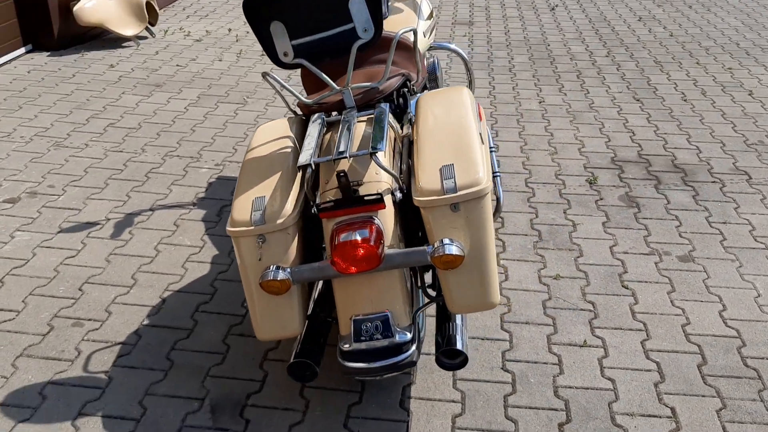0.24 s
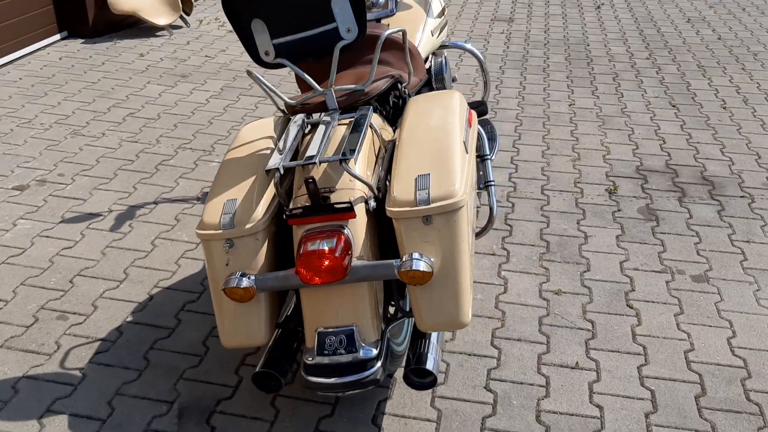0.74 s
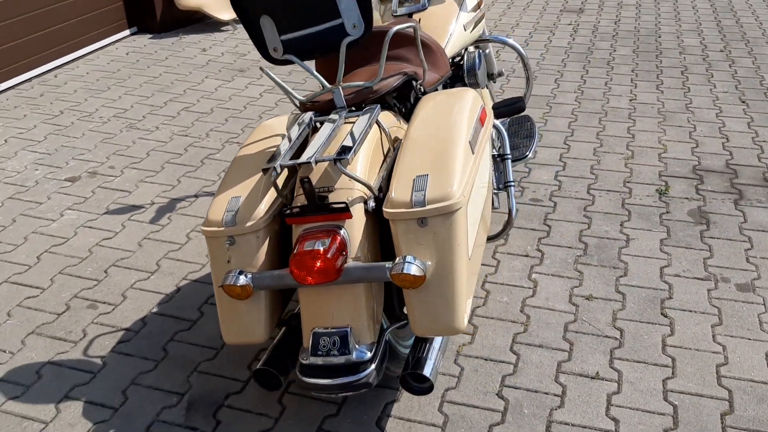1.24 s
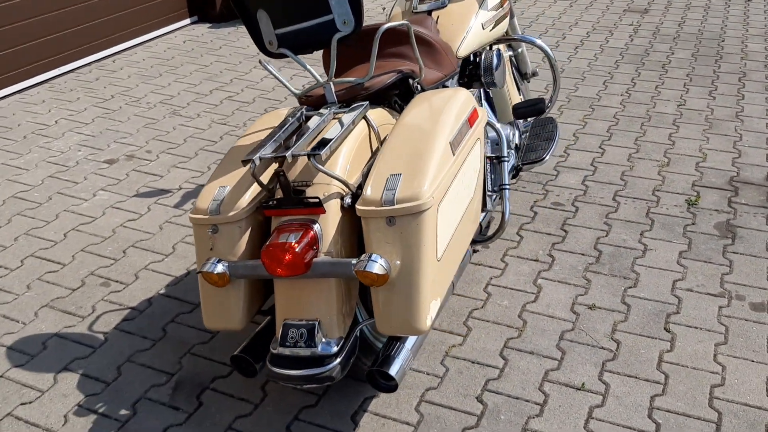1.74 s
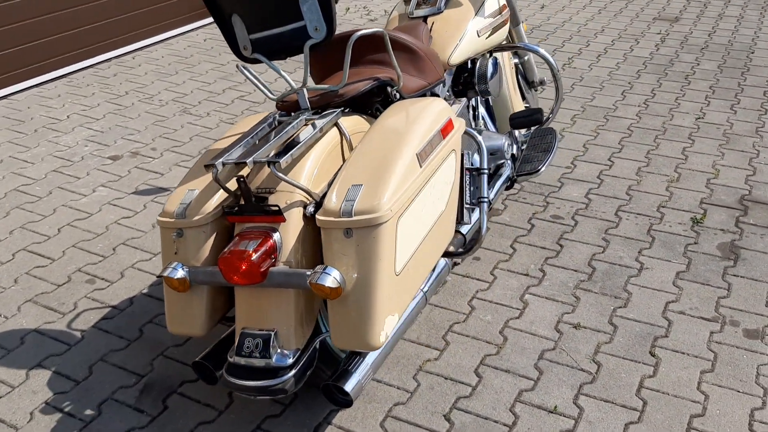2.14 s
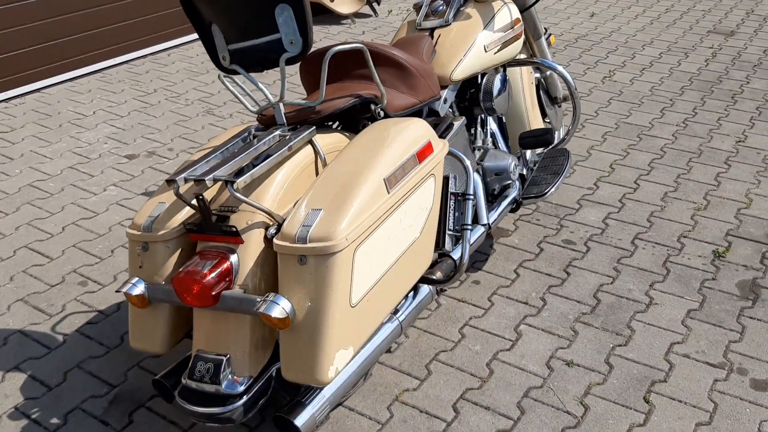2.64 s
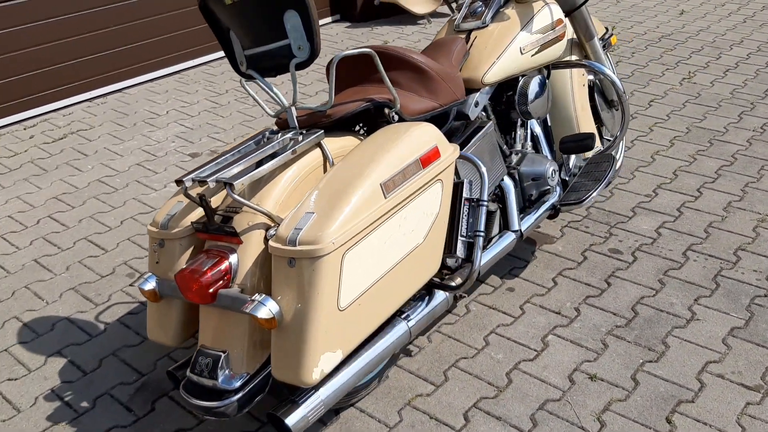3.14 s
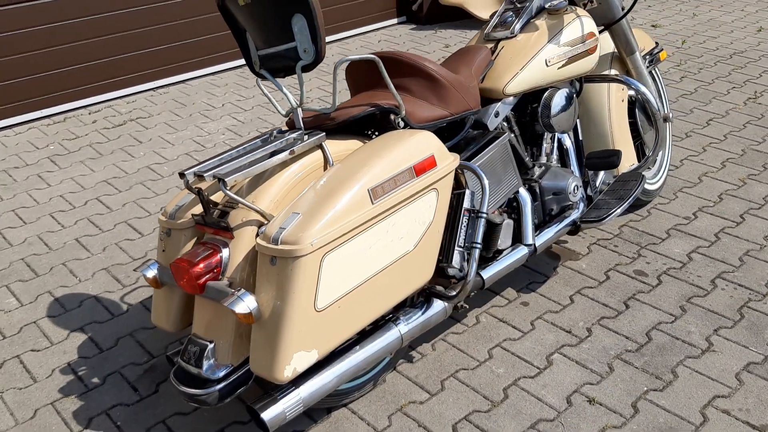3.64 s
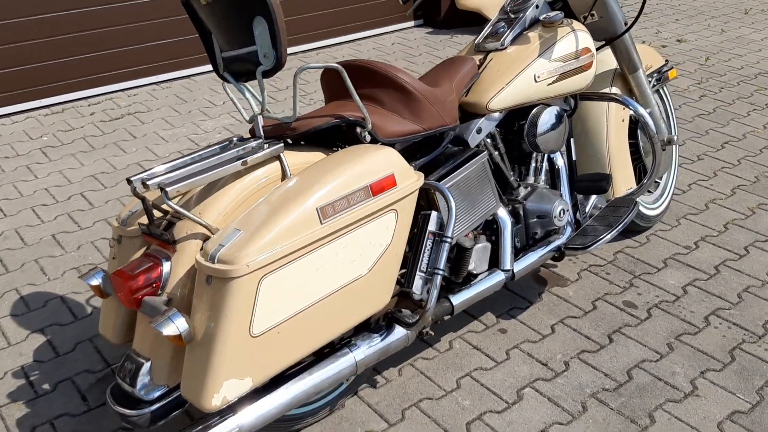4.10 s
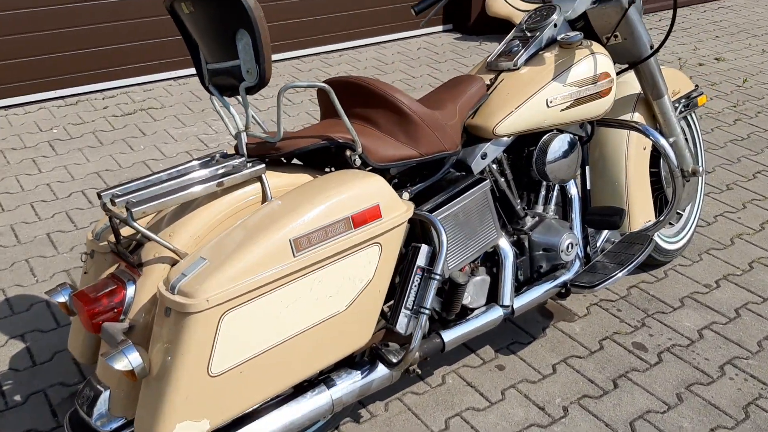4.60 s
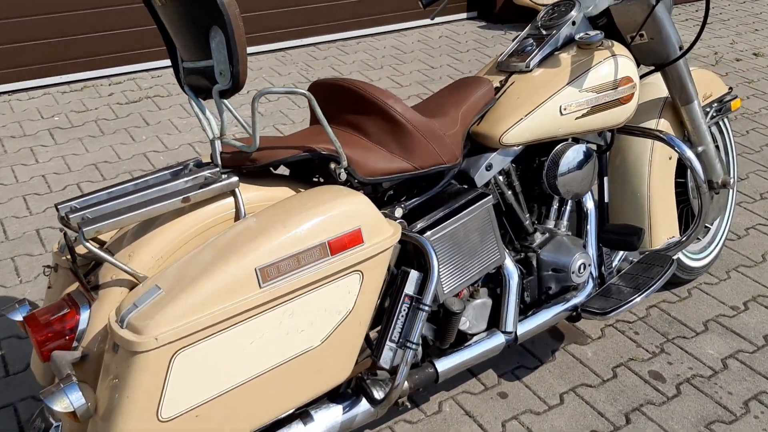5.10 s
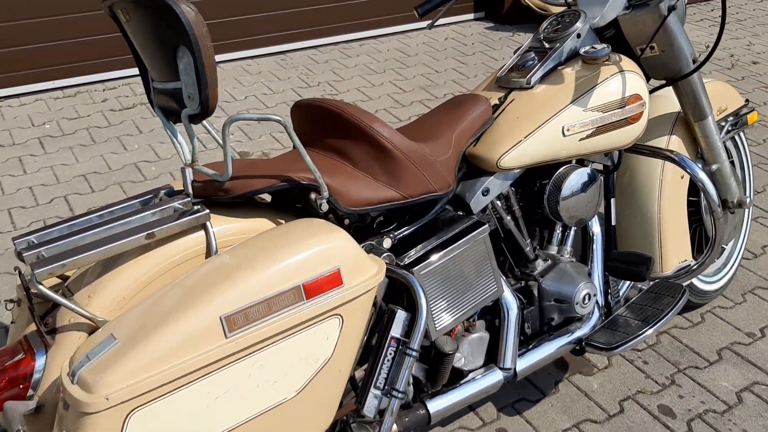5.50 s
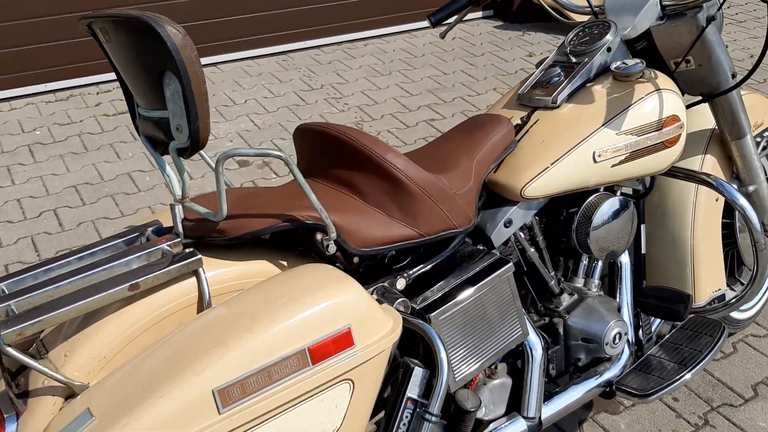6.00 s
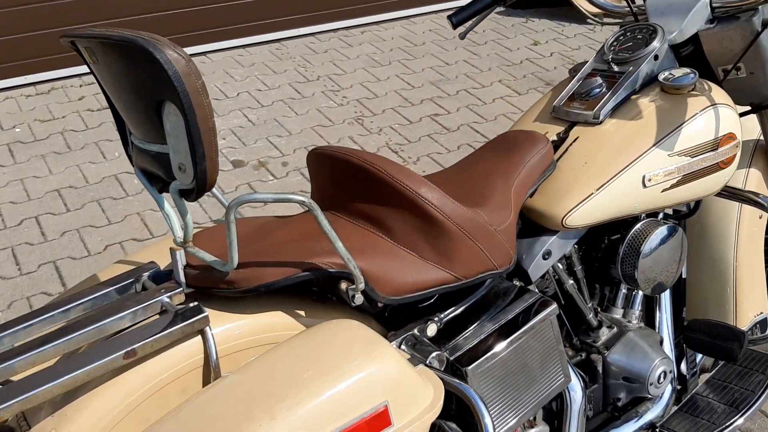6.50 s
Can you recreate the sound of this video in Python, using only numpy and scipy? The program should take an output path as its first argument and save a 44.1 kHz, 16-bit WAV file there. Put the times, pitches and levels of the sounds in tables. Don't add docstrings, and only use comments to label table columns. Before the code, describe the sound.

A heavy twin-cylinder motorcycle engine runs at a slow, loping idle throughout, close and dry in open air, in stereo. Strong low exhaust beats alternate irregularly with weak or missed ones. Gas puffs hiss and chirp, pipe shields and luggage rack buzz with the blows. The listener walks from the exhaust outlets to the engine side, where metallic clatter and intake breaths come forward while whistles fade.

```python
import sys
import numpy as np
from scipy import signal
from scipy.fft import rfft, irfft, next_fast_len
from scipy.io import wavfile
from scipy.ndimage import uniform_filter1d, map_coordinates

SR = 44100
rng = np.random.default_rng(int(sys.argv[2]) if len(sys.argv) > 2 else 0)


def invert_db(x):
    u = np.asarray(x, float) / 20
    return 10 ** u


def to_wav(s):
    ch = np.atleast_2d(s).T
    pcm = np.round(np.clip(ch, -1, 1) * 32767)
    wavfile.write(sys.argv[1], SR, pcm.astype(np.int16))


N = 297675

# (time [s], blow [1 = usual], jet hiss [dB])
FRONT_FIRINGS = [(0.3628, 1.52, -31.5), (0.6893, 1.38, -32), (0.8428, 1, -39), (0.9919, 1.32, -35.5),
                 (1.301, 1.1, -39), (1.6326, 1.24, -32), (1.784, 0.95, -38.5), (1.9351, 1.03, -36),
                 (2.086, 0.92, -37.5), (2.2462, 1.02, -35.5), (2.401, 0.98, -38), (2.553, 0.94, -39.5),
                 (2.7103, 1.07, -35), (2.8531, 0.99, -36.5), (2.9994, 1, -34), (3.3108, 0.92, -33.5),
                 (3.6013, 1.02, -34), (3.912, 0.95, -37), (4.068, 0.89, -36), (4.2243, 1.08, -35.5),
                 (4.5745, 1, -29), (4.912, 1.17, -30), (5.1008, 0.93, -30.5), (5.431, 0.95, -34.5),
                 (5.6058, 1.01, -35.5), (5.7761, 0.95, -33.5), (5.9476, 1.03, -34), (6.2891, 1.15, -34.5),
                 (6.6275, 1.31, -33.5)]
# (time [s], blow [1 = usual], jet hiss [dB])
FRONT_STUMBLES = [(-0.024, 1, -32), (0.18, -0.29, -47.5), (0.5261, -0.55, -47), (1.139, -0.42, -47),
                  (1.4721, -0.41, -47), (3.1484, 0.79, -39.5), (3.4535, 0.78, -40), (3.7522, 0.65, -42),
                  (4.3866, -0.5, -38.5), (4.743, -0.52, -40.5), (5.265, 0.71, -36), (6.1128, 0.42, -38),
                  (6.4616, 0.62, -39.5)]
# (time [s], blow [1 = usual], jet hiss [dB])
REAR_FIRINGS = [(0.065, -0.35, -53), (0.2704, 1.15, -37.5), (0.5986, 1.25, -35.5), (0.9103, 1.1, -36.5),
                (1.5456, 1.22, -36), (1.8513, 1.09, -36.5), (2.3153, 1.06, -34), (2.7767, 1.05, -39),
                (3.219, 0.34, -46), (3.3759, 1, -38.5), (3.8232, 0.84, -36), (3.9792, 0.5, -43.5),
                (4.1349, 0.81, -40), (4.6536, 1.1, -33), (5.18, 1.18, -33.5), (5.5072, 0.93, -35),
                (5.6817, 0.95, -36.5), (6.02, 1.07, -33.5), (6.541, 1.1, -35), (6.693, -0.53, -42)]
VALVE_SHUTS = [
    (.64, 0.092),
    (.48, .33),
]

# (delay [ms], strength [ratio])
FRONT_ARRIVALS = [(-18.06, .16), (-10.39, -.65), (-5.68, -.5), (2.03, .09), (20.04, -.06)]
# (delay [ms], strength [ratio])
REAR_ARRIVALS = [(-18.94, .13), (-10.28, -.87), (-5.06, -.77), (6.04, .06), (23.7, .09)]
# (frequency [Hz], width [Hz])
LOW_CUT = [(86.4, 34.8), (56.3, 8)]
# (frequency [Hz], width [Hz])
CHAMBERS = [(148.4, 25.8), (90.7, 13)]
# (frequency [Hz], width [Hz], level [dB])
HEADER_PIPE = [(212.5, 30.4, -7.3)]

# (frequency [Hz], level [dB per Hz])
BURBLE_COLOUR = [(30, -48), (45, 6), (60, 2.5), (170, 5.5), (210, -17.5), (255, -5.5), (290, -14),
                 (400, -63)]
# (frequency [Hz], level [dB per Hz])
JET_COLOUR = [(1470, -65), (2500, -5), (3880, -15.5), (4460, 0), (4970, -4.5), (6410, -4), (7200, 0),
              (8730, -14), (9580, -11), (11400, -5.5), (13600, -10.5), (15800, -10)]
# (frequency [Hz], level [dB per Hz])
RASP_COLOUR = [(180, -61), (300, 11), (499, 7.5), (600, -15), (746, 2.5), (1280, -5.5), (1510, 7),
               (1660, -4.5), (4000, -7.5), (5200, -35), (8800, -120)]
# (frequency [Hz], level [dB per Hz])
CASES_COLOUR = [(160, -53), (280, -2.5), (497, -1), (630, -4), (771, -0.5), (882, -7), (1280, -7.5),
                (1490, -7), (1680, -10), (4170, -13.5), (6580, -17), (8620, -28), (11700, -21.5),
                (15800, -29)]

# (frequency [Hz], width [Hz], level [dB])
COVER_MODES = [(740, 110, -3), (1050, 150, -5), (1510, 130, -7), (2030, 60, -6), (3710, 100, -14)]
# (frequency [Hz], width [Hz], level [dB])
SEAT_MODES = [(2633, 150, 4.5), (4400, 73, 4.5), (5196, 120, 7.5), (5640, 190, -1)]
# (frequency [Hz], width [Hz], level [dB])
NEAR_SEAT_MODES = [(2620, 260, -2), (4520, 230, 0)]
# (frequency [Hz], width [Hz], level [dB])
PORT_MODES = [(520, 150, -12), (700, 110, -3)]
# (frequency [Hz], width [Hz], level [dB])
SHIELD_MODES = [(238.2, 15.5, 5.5), (385, 19, -16), (490, 44, -27)]
# (frequency [Hz], width [Hz], level [dB])
RACK_MODES = [(1546, 140, 5.5), (3020, 73, 4), (3480, 86, 6)]
# (frequency [Hz], width [Hz], level [dB])
INTAKE_MODES = [(790, 540, -10), (1095, 140, 3), (1900, 1120, -9)]
# (frequency [Hz], width [Hz], dying time [s])
LIP_TONES = [(3200, 307, 0.0051), (6670, 170, 0.001), (7830, 810, 0.0018)]
# (first [dB], second [dB], third [dB])
LIP_LEVELS = [
    (-10, -2, -16),
    (-7.5, -9.5, -20),
]

# (time [s], level [dB])
CASES_WALK = [(0.0, -40), (0.26, -43), (0.45, -40), (0.88, -41.5), (1.37, -41), (1.82, -41), (2.37, -40),
              (3.5, -36.5), (3.72, -38.5), (5.17, -37), (6.26, -36), (6.75, -34)]
# (time [s], level [dB])
INTAKE_WALK = [
    (0, -50.5),
    (3, -52),
    (4.5, -44.5),
    (6.75, -43.5),
]
# (time [s], exhaust port [dB], rack [dB])
FACING_WALK = [(0, -11, -22.5), (2.1, -11, -25.5), (2.55, -8, -18.5), (3.0, -8, -29), (6.75, -5.5, -46)]
# (time [s], level [dB])
SHIELDS_WALK = [(0, -4), (2.5, 0), (3.5, -1.5), (6.75, -3)]
# (time [s], level [dB])
WHISTLE_WALK = [(0, 8.5), (1.0, 7.5), (1.3, 17.5), (1.6, 8), (2.25, 8), (2.4, 0.5), (3.3, 0.5), (3.6, -5),
                (5.2, -8), (5.4, 2), (6.0, 2), (6.75, -6)]

# (frequency [Hz], likeness [-1 to 1])
STEREO_LIKENESS = [(60, 1), (180, 0.92), (550, 0.94), (1650, 0.59), (4970, -0.36), (15000, -0.05)]
# (frequency [Hz], left minus right [dB])
PORT_BALANCE = [(40, 2.2), (110, 1.5), (250, .6), (500, .2), (1300, .5), (3000, -.6), (5500, -2.2),
                (10000, -1.1)]

USUAL_GAP_S = 0.081


def unit(x):
    return x / np.sqrt(np.mean(x ** 2) + 1e-20)


def along(points, hz):
    f, v = np.transpose(points)
    return np.interp(np.log(hz + 1), np.log(f + 1), v)


def over_time(walk, column=1):
    points = np.transpose(walk)
    return np.interp(np.arange(N) / SR, points[0], points[column])


def filtered(x, response):
    m = next_fast_len(N + SR // 5)
    return irfft(rfft(x, m) * response(np.fft.rfftfreq(m, 1 / SR)), m)[..., :N]


def modes(table, f):
    return sum((-1) ** k * invert_db(db) * 1j * f * w / (c * c - f * f + 1j * f * w)
               for k, (c, w, db) in enumerate(table))


def train(times, sizes, count=0):
    at = np.round(times * SR).astype(int) + count
    return np.bincount(np.clip(at, 0, N + count - 1), sizes * (at >= 0), N + count)


def swell(times, sizes, rise_s, fall_s):
    t = np.arange(SR // 8) / SR
    shape = np.where(t < rise_s, (t / rise_s) ** 2, np.exp(-(t - rise_s) / fall_s))
    return signal.oaconvolve(train(times - rise_s, sizes, count=len(t)), shape)[len(t):][:N]


def flat(f):
    return f > 0


def noise(response, alike):
    def mid_side(f):
        turn = np.arccos(np.clip(along(alike, f), 0, 1)) / 2
        return response(f) * [np.cos(turn), np.sin(turn)]
    mid, side = filtered(rng.standard_normal((2, N)), mid_side)
    return unit(np.array([mid + side, mid - side]))


def patches(depth_db):
    return invert_db(depth_db * map_coordinates(rng.standard_normal(N // 900 + 4), [np.arange(N) / 900]))


def closer_db(s):
    return np.interp(s, *np.transpose(INTAKE_WALK)) - INTAKE_WALK[0][1]


def openings():
    front, rear = np.array(sorted(FRONT_FIRINGS + FRONT_STUMBLES)), np.array(REAR_FIRINGS)
    s, worst = front[:, 0], np.minimum(front[:-1, 1], front[1:, 1])
    unfired = np.diff(np.searchsorted(rear[:, 0], s)) == 0
    cycle_share = .443 - .012 * (1 - worst)
    due = (s[:-1] + np.diff(s) * cycle_share)[unfired]
    misfire = -0.52 + 4.3 * (s[1:][unfired] - due - USUAL_GAP_S)
    idle = np.c_[due, misfire, -47.5 + 1.2 * closer_db(due)]
    rear = np.r_[rear, idle]
    rows = np.r_[np.c_[front, np.zeros(len(front))], np.c_[rear, np.ones(len(rear))]]
    return rows[np.argsort(rows[:, 0])].T


def tappet_knocks():
    s = openings()[0]
    angle = np.array([.2, .36, .55, .72, .84])
    chance = rng.standard_normal((len(s) - 1, 2, len(angle)))
    ticks = s[:-1, None] + np.diff(s)[:, None] * angle + 0.0028 * chance[:, 0]
    return swell(ticks.ravel(), invert_db(5.1 * chance[:, 1].ravel()), 0.0024, 0.0051)


def cases_and_fins(knock):
    s = openings()[0]
    cases_db = over_time(CASES_WALK)
    fins_db = cases_db - 9 + .3 * closer_db(np.arange(N) / SR)

    def body(f):
        return invert_db(along(CASES_COLOUR, f))
    steady = unit(1.3 + 0.19 * knock) * patches(1.97)
    cases = steady * noise(lambda f: body(f) / (1 + (f / 3000) ** 7), STEREO_LIKENESS)
    stroke = 1.0 + 0.035 * knock + swell(s + 0.0026, np.full(len(s), .7), 0.012, 0.13)
    fins = unit(stroke) * noise(lambda f: body(f) / (1 + (3700 / (f + 1)) ** 5), [(1000, 0.1)])
    return invert_db(cases_db) * cases + invert_db(fins_db) * fins


def tappets(knock):
    level_db = over_time(CASES_WALK) - 10.5 + .4 * closer_db(np.arange(N) / SR)
    struck = knock * noise(flat, STEREO_LIKENESS)
    return invert_db(level_db) * unit(filtered(struck, lambda f: modes(COVER_MODES, f) ** 2))


def valves():
    s, side_db = openings()[0], closer_db(np.arange(N) / SR)
    chatter = swell(s - .004, invert_db(1.5 * rng.standard_normal(len(s))), .004, .012)
    rattle = chatter * noise(flat, [(1000, 0.66)])
    seats = unit(filtered(rattle, lambda f: modes(SEAT_MODES, f) ** 2))
    tick = unit(filtered(rattle, lambda f: modes(NEAR_SEAT_MODES, f) ** 2))
    seats_db = over_time(CASES_WALK) - 14 + .1 * side_db
    return invert_db(seats_db) * seats + invert_db(-61.5 + 1.5 * side_db) * tick


def burble():
    s, blow, _, _ = openings()
    flow = 0.44 + swell(s, .4 * np.abs(blow), 0.0067, 0.07)
    return invert_db(-28) * flow * noise(lambda f: invert_db(along(BURBLE_COLOUR, f)), STEREO_LIKENESS)


def jets():
    s, _, hiss_db, _ = openings()
    puff = swell(s - .009, invert_db(hiss_db + 2.5), 0.011, 0.0079)
    tail = swell(s - .004, invert_db(hiss_db - 16.5), 0.01, 0.092)
    return (puff + tail) * noise(lambda f: invert_db(along(JET_COLOUR, f)), [(1000, 0.12)])


def rasp():
    s, blow, _, rear = openings()
    labour_db = 294 * (np.diff(s, prepend=-.1) - 0.074)
    rear_db = rear * (2.5 + 0.18 * closer_db(s) + labour_db)
    level_db = np.maximum(-36.5 + 15.5 * (blow - 1) + rear_db, -43)
    flow = swell(s - .006, invert_db(level_db + 2), 0.03, 0.029) * patches(depth_db=1.5)
    return flow * noise(lambda f: invert_db(along(RASP_COLOUR, f)), STEREO_LIKENESS)


def pipe(f, paths):
    cut = np.prod([f * f / (c * c - f * f + 1j * f * w) for c, w in LOW_CUT], axis=0)
    chambers = np.prod([c * c / (c * c - f * f + 1j * f * w) for c, w in CHAMBERS], axis=0)
    arrivals = sum(size * np.exp(-2j * np.pi * f * ms / 1000) for ms, size in paths)
    return 20 * cut * (chambers + modes(HEADER_PIPE, f)) * arrivals


def thumps(cylinder, paths, cold):
    s, blow, _, rear = openings()
    share, suck = VALVE_SHUTS[cylinder]
    gap, own = np.diff(s, append=s[-1] + 0.048), rear == cylinder
    shut = s + share * gap
    suck = np.maximum(suck - 10 * (gap - USUAL_GAP_S) * rear * (blow > 0), 0)
    hot = train(s, own * np.maximum(blow, 0))
    back = train(s, own * np.minimum(blow, 0)) - train(shut, own * suck)
    return filtered(hot, lambda f: pipe(f, paths)) + filtered(back, lambda f: pipe(f * cold, paths))


def link_pipe():
    s, blow, _, rear = openings()

    def boom(f):
        return modes([(247.4, 14, 0)], f) * f ** 2 / (f ** 2 + 200 ** 2)
    strokes = train(s + 0.0041, rear * np.abs(blow))
    return invert_db(over_time(SHIELDS_WALK)) * invert_db(23.5) * filtered(strokes, boom)


def heat_shields():
    s, blow, _, rear = openings()
    strength = (0.7 + 0.3 * rear) * np.maximum(blow, 0)
    shake = swell(s + 0.0028, strength, 0.0064, 0.018) * rng.standard_normal(N)
    return invert_db(over_time(SHIELDS_WALK)) * filtered(shake, lambda f: modes(SHIELD_MODES, f))


def rack():
    s, blow, _, rear = openings()
    strength = (0.59 + .5 * rear) * np.maximum(blow, 0) ** 2
    buzz = swell(s - .003, strength, 0.0098, 0.0069) * noise(flat, [(1000, 0.95)])
    return invert_db(over_time(FACING_WALK, 2)) * filtered(buzz, lambda f: modes(RACK_MODES, f) ** 2)


def exhaust_port():
    s, blow, _, rear = openings()
    bark = swell(s - .013, rear * np.maximum(blow, 0) ** 2, 0.021, 0.014) * rng.standard_normal(N)
    return invert_db(over_time(FACING_WALK, 1)) * filtered(bark, lambda f: modes(PORT_MODES, f))


def intake():
    s = np.transpose(FRONT_FIRINGS + FRONT_STUMBLES)[0]
    gulp = swell(s - .036, invert_db(1.1 * rng.standard_normal(len(s))), 0.017, 0.025)
    air = filtered(gulp * noise(flat, STEREO_LIKENESS), lambda f: modes(INTAKE_MODES, f))
    return invert_db(over_time(INTAKE_WALK)) * unit(air)


def whistles():
    out, t = np.zeros((2, N + SR)), np.arange(SR // 20) / SR
    aside_s = np.array([[1], [-1]]) * .000022
    lead_s = .0115
    for opens, blow, jet_db, rear in openings().T:
        if blow < .8 or opens < lead_s:
            continue
        start = round((opens - lead_s - .001) * SR)
        db = jet_db + np.interp(opens, *np.transpose(WHISTLE_WALK)) - rear * closer_db(opens)
        chance = rng.standard_normal(len(LIP_TONES) + 1)
        main_hz = 5480 + 90 * chance[0]
        levels_db = [0, *(LIP_LEVELS[int(rear)] + 2 * chance[1:])]
        tones = [(main_hz, 150, .004)] + LIP_TONES
        for (tone_hz, width, dying), level_db in zip(tones, levels_db):
            fall = np.exp(-np.maximum(t - .007, 0) / dying) + 0.22 * np.exp(-t / 0.023)
            gate = np.minimum(t / 0.0015, 1) * fall
            drift = uniform_filter1d(rng.standard_normal((3, len(t))), size=40)
            shared, *own = np.cumsum(drift, axis=1) * 4 * width / SR
            turns = tone_hz * (t + aside_s) + shared + 0.5 * np.array(own)
            out[:, start:start + len(t)] += invert_db(db + level_db - 2) * gate * np.sin(2 * np.pi * turns)
    return out[:, :N]


def scene():
    knock = tappet_knocks()
    engine = cases_and_fins(knock) + tappets(knock) + valves()
    gas = burble() + jets() + rasp()
    exhaust = thumps(0, FRONT_ARRIVALS, cold=1) + thumps(1, REAR_ARRIVALS, cold=1.05)
    shaken = link_pipe() + heat_shields() + rack() + exhaust_port()
    return engine + gas + exhaust + shaken + intake() + whistles()


def low_pass(x):
    return signal.sosfilt(signal.butter(12, 15970, fs=SR, output="sos"), x)


def record(dry):
    side = np.array([[1], [-1]])

    def ports(f):
        lead = 0.56 / (1 + (f / 90) ** 2) - 2 * np.pi * .00009 * f
        return invert_db(side * along(PORT_BALANCE, f) / 2) * np.exp(.5j * side * lead) * (f < 15900)
    heard = filtered(dry, ports)
    top, knee = 1.0, 6
    mix = heard / (1 + np.abs(heard / top) ** knee) ** (1 / knee)
    return low_pass(mix)


dry = scene()
out = record(dry)
to_wav(out)
```